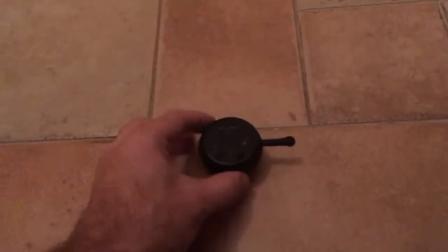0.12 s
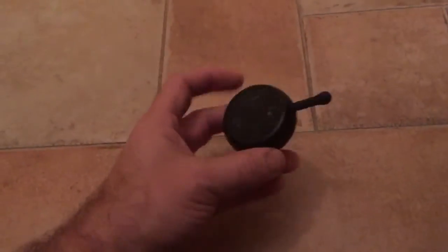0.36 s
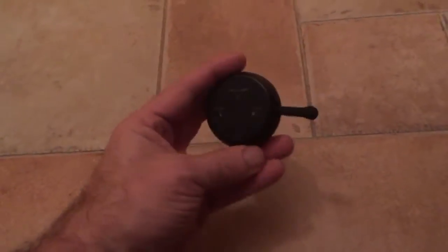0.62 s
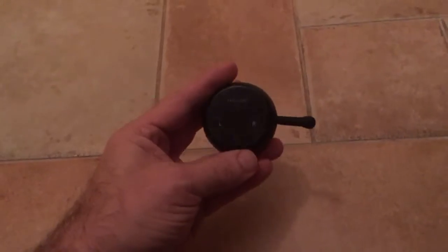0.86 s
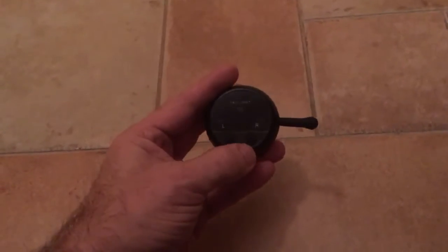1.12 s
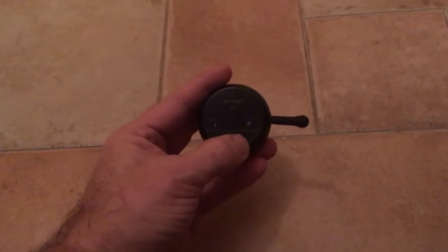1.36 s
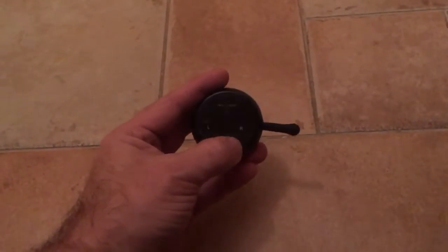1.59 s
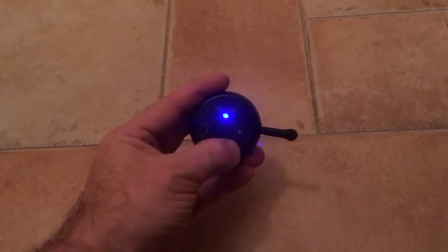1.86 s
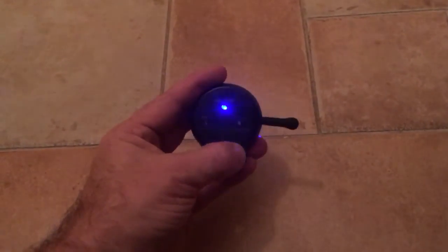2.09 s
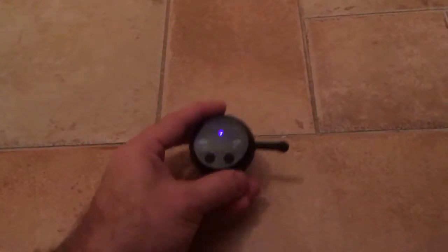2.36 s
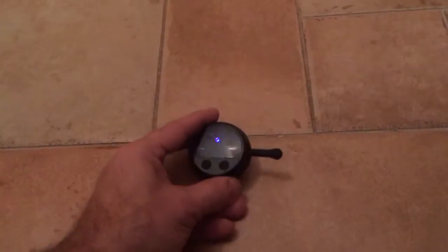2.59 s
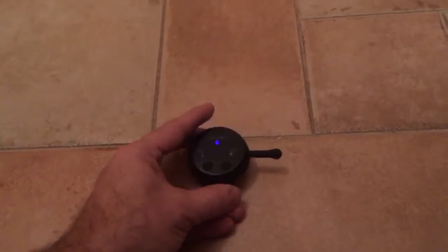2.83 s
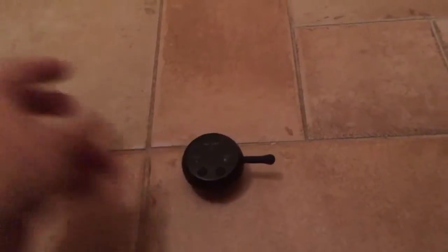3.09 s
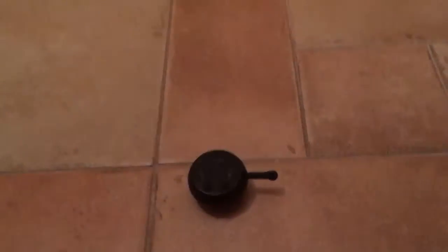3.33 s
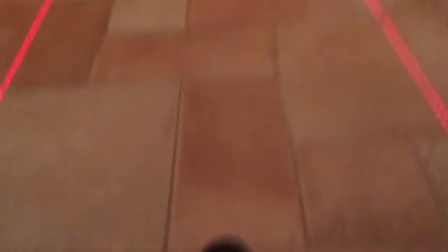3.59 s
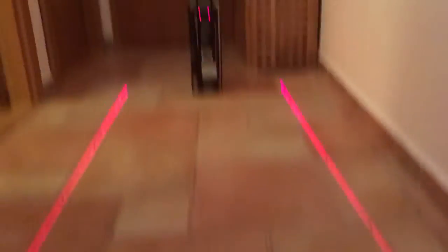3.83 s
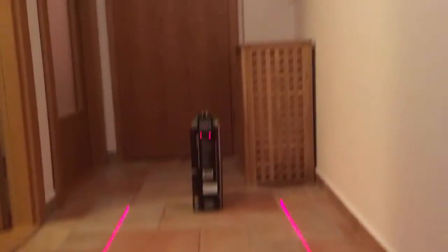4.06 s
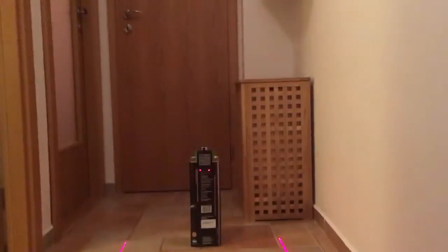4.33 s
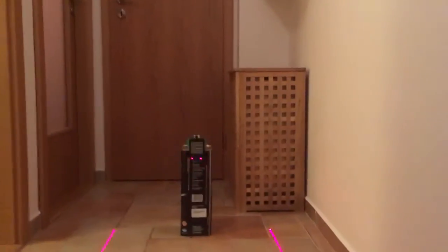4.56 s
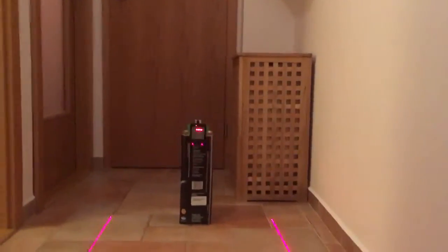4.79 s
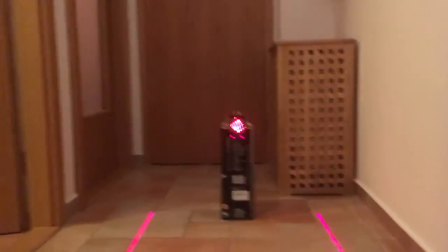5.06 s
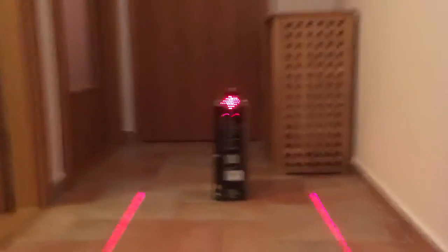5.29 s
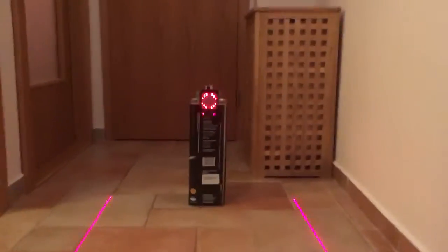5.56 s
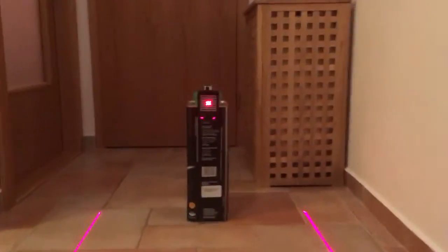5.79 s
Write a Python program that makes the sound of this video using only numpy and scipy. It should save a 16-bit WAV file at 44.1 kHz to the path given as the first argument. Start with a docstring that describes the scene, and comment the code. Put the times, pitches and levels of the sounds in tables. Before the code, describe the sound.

Sharp plastic clicks of a small remote lifted and set down on tile, then loud handling knocks on the phone over faint hum and hiss.

```python
"""Sharp plastic clicks open the scene: a hand lifts a small remote off a tiled floor, presses its button and
sets it down in a bare hallway. Then fingers click, drag and thump on the phone that holds the microphone.
Clicks are struck banks of ringing modes, drags and sleeve rustle are shaped noise, thumps are fading low sines.
Underneath, an appliance hums near 81 Hz over lumpy noise rumble; the microphone circuit adds coloured hiss
and the faint two-humped blips of a radio beacon."""
import sys
import numpy as np
from scipy import signal
from scipy.fft import rfft, irfft, next_fast_len
from scipy.io import wavfile
from scipy.ndimage import map_coordinates

SR = 44100
rng = np.random.default_rng(int(sys.argv[2]) if len(sys.argv) > 2 else 0)


def voltage_ratio(decibels):
    """Convert decibels (scalar or array-like) to amplitude ratios, 20 dB per decade."""
    exponent = np.asarray(decibels, float) / 20
    return 10 ** exponent


def store_pcm(level_fs):
    """Save levels as 16-bit WAV."""
    pcm = np.round(np.clip(level_fs, -1, 1) * 32767).astype(np.int16)
    wavfile.write(sys.argv[1], SR, np.atleast_2d(pcm).T)


N = 261072

# taps on the remote: t/s, level/dB, hardness/(dB per octave), lean/dB from the 3.4 kHz to the 1.8 kHz mode,
# hallway level/dB re the tap
REMOTE_TAPS = [(.0065, -25, -1.5, -1.5, -11), (.034, -46.5, 2.5, 9, 1), (0.0511, -35.5, -4.5, 2, -30),
               (.061, -37, -2, 6, -19), (.371, -64, 10, 9.5, -9), (0.417, -49.5, 0.5, -2.5, -13),
               (0.425, -54.5, 5, 8.5, -18), (.72, -65, 6.5, 1.5, -3.5), (1.7895, -41.5, 9, -1, -14.5),
               (2.0156, -40, 10.5, -3, -12.5), (2.3, -53.5, -5.5, -7, -13), (2.371, -56.5, 6.5, -1.3, -4.5),
               (2.463, -38, 6.5, 0.7, -5.5), (2.7, -54, -2, -3, -6), (2.78, -47.5, -2.5, 4.5, 1),
               (2.8006, -27.5, .9, 6.5, -9.5), (2.803, -25, -3, -9.5, -9), (2.811, -40.5, 4.5, -6, -23),
               (2.819, -38, -1, 1, -13), (2.826, -33.5, 0.2, -6, -22), (2.835, -39.5, -2, -1, -11)]
# ringing modes of the remote's shell: f/Hz, width/Hz, level/dB for a plain tap
SHELL_MODES = [(316, 140, -13), (936, 127, -2.5), (1890, 470, 0.5), (3340, 630, -5.5), (6130, 680, -17),
               (13300, 3100, -36)]
# how the struck spot favours one of the two middle shell modes: one weight per mode, times the lean
MODE_LEAN = np.array([0, 0, 1, -1, 0, 0])
# reverberation of the hallway: f/Hz, t60/s
HALL_DECAY = [(200, 0.18), (1000, 0.38), (3500, 0.31), (7000, 0.41), (12000, 0.07)]
# finger clicks on the phone: t/s, 1.3 kHz level/dB, then 730 Hz, 3.3 kHz and treble level/dB re the first
GRIP_CLICKS = [(3.2938, -58.5, 11, 12.5, -6), (3.5444, -60, 12, -19.5, -13), (3.5856, -59.5, 14, 9, -1),
               (3.6506, -64.5, 4, 18, 0), (3.752, -56, 0, -4, -12), (3.777, -51, -24, 3, -14),
               (3.7955, -29, -12, 9, -6.5), (3.8267, -29.5, -6, -7, -14.5), (3.853, -51, 5, -16, -16),
               (3.872, -40.5, 4, -0.5, -15), (4.02, -39.5, -24, -3.5, -15), (4.024, -45, -29, -4, -15),
               (4.5854, -56, 17, 3, -13), (4.8216, -49, -4, -3, -21), (4.83, -14.5, -43, -4, -14),
               (4.9337, -35.5, -22, .1, -12.5), (5.0224, -52, -27, -6, -9), (5.0527, -30.5, 14, 19, -33),
               (5.0678, -37, 16, 17.5, 2.5), (5.1274, -66.5, -15, 23, -2.1)]
# ringing modes of the phone case: f/Hz, width/Hz, level/dB
CASE_MODES = [(1288, 800, 2), (717, 353, -3.5), (3290, 1900, 1), (7600, 10800, 4.5), (170, 700, 8.5)]
# fingertips dragging on the case: start t/s, rise/s, peak level/dB, fade/(dB per s), bright layer level/dB re dull
FINGER_DRAGS = [(3.57, 0.011, -64, 303, -6), (3.61, 0.05, -69, 608, -7), (3.7, 0.11, -60, 150, -1),
                (3.79, 0.036, -45.5, 1300, -2), (3.81, 0.044, -49, 1500, -8), (3.85, .03, -76, 598, -9),
                (4.012, 0.017, -56.5, 1300, -6), (4.815, 0.014, -39, 1347, -9),
                (5.016, 0.005, -63, 302, 6.5), (5.035, 0.0091, -48, 256, -13),
                (5.055, 0.0091, -45, 1500, 10.5), (5.06, .032, -73, 1500, -28)]
# palm pressing the case, from small presses to slow lurches of the phone: t/s, peak level/dB, f/Hz, t60/s
PALM_THUMPS = [(.755, -45.5, 103, 0.027), (1.432, -44.5, 105, 0.01), (1.677, -54.5, 175, 0.054),
               (3.599, -52, 44.6, 0.2), (3.873, -44, 128, 0.055), (3.874, -39.5, 56, 0.079),
               (4.138, -48.5, 170, .031), (4.226, -49, 156, 0.049), (4.834, -36, 69, 0.056),
               (5.067, -27.5, 80, 0.031), (5.31, -38, 59, .3), (5.312, -49.5, 250, 0.039),
               (5.339, -39.5, 110, 0.0071), (5.386, -44, 102, 0.013), (5.636, -42.5, 150, 0.041),
               (5.74, -47.5, 156, 0.049), (5.811, -40, 144, 0.0077), (5.844, -53, 130.6, 0.082)]
# notches of the microphone port: f/Hz, width/Hz, depth/(0-1)
PORT_NOTCHES = [(2300, 500, .6), (5000, 1000, .85), (10400, 900, .6)]
# sleeve strokes: start t/s, rise/s, peak level/dB, fade/(dB per s), level/dB above 4.5 kHz re the cloth spectrum
SLEEVE_STROKES = [(-.01, 0.014, -54.5, 118, -6), (.1, 0.21, -75.5, 9, -11), (1.25, 0.048, -63, 78, -11),
                  (2.47, 0.075, -72, 6, -4), (3.04, 0.082, -60.5, 75, 3), (3.22, 0.081, -70, 73, -16),
                  (3.55, 0.2, -72, 25, -1.5), (4.0, 0.53, -78, 49, -3), (4.85, 0.079, -70.5, 4.5, -7),
                  (5.124, 0.0051, -65.5, 72, 6), (5.17, 0.073, -60.5, 190, -8), (5.32, 0.21, -72.5, 39, -2),
                  (5.55, 0.074, -72.5, 71, -13), (5.74, 0.2, -82, 16, -3)]
# spectrum shape of rubbing cloth: f/Hz, relative level/(dB per Hz)
CLOTH_SPECTRUM = [(290, -3), (500, -8), (661, -34), (699, -18.5), (990, -0.5), (1080, -4), (1380, -3),
                  (1850, -2.5), (2350, -9.5), (3330, 2.5), (4720, -13), (6150, -8.5), (8710, -22),
                  (14000, -22)]
# course of the appliance hum: t/s, level/dB
HUM_LEVEL = [(0, -61.5), (.4, -55), (.7, -58), (2.2, -58), (2.8, -54.5), (3.5, -61), (4.4, -65.5),
             (4.85, -66), (4.98, -51.5), (5.2, -69), (5.92, -85)]
# course of the room rumble: t/s, level/dB
RUMBLE_LEVEL = [(0, -54.5), (.3, -62), (.65, -60), (2.4, -60), (2.7, -58), (3.2, -60.5), (3.55, -54),
                (3.85, -55.5), (4.4, -59.5), (5.0, -55.5), (5.92, -56.5)]
# spectrum shape of the room rumble: f/Hz, relative level/(dB per Hz)
RUMBLE_SPECTRUM = [(15, -14), (30, -4), (60, 4.5), (100, -9), (160, -10.5), (300, -18.5), (450, -29.5),
                   (700, -28.5), (1000, -120)]
# beacon bursts on the steady beat, a few of them missed: t/s
BEACON_BEAT = np.delete(.0914 + .1024 * np.arange(57), [8, 18, 26, 27, 28, 47])
# beacon bursts off the beat or weakened: t/s, level/dB re a plain burst
BEACON_STRAYS = [(.7475, -6), (.8835, 0), (1.8876, -4), (1.9346, -5), (2.7209, -3), (2.8905, -5),
                 (2.9587, -4), (4.8971, 0), (5.9011, 0)]
# spectrum shape of the circuit hiss: f/Hz, relative level/(dB per Hz)
HISS_SPECTRUM = [(240, -24), (400, -13), (676, -0.5), (839, -2), (1510, -8), (1820, -8), (2430, -10.5),
                 (3470, -3), (4800, -13.5), (5520, -11), (7630, -15), (9470, -12.5), (10400, -15),
                 (14800, -6), (16000, -26)]


def remote():
    """Clicks and taps ring the plastic shell, each with its own hallway answer; harder contacts ring brighter."""
    pivot_hz, top_hz = 960, 6450  # hardness tilts the modes about the first, up to the second
    octaves = np.log2(np.minimum(np.array(SHELL_MODES)[:, 0], top_hz) / pivot_hz)
    sounds = []
    for _, db, hard_db, lean_db, wet_db in REMOTE_TAPS:
        levels_db = db + hard_db * octaves + lean_db * MODE_LEAN
        # the walls average over all directions and hear the plain modes, without scrape
        plain = struck(levels_db, SHELL_MODES, contact_s=1, scrape=0, order=0)
        sound = voltage_ratio(wet_db) * hall(plain)
        tap = struck(levels_db, SHELL_MODES, contact_s=.002, scrape=.13, order=0)
        sound[:len(tap)] += tap
        sounds.append(sound)
    return placed([row[0] for row in REMOTE_TAPS], sounds)


def hall(x):
    """Tiles and bare walls answer after a gap; each frequency dies at its own speed."""
    gap_s, build_s = .004, .007
    hz, t, z = signal.stft(rng.standard_normal(SR // 2), SR, nperseg=256)
    decay = voltage_ratio(-60 * t / along(HALL_DECAY, hz)[:, None])
    tail = signal.istft(z * decay, SR, nperseg=256)[1]
    tail *= 1 - np.exp(-np.arange(len(tail)) / SR / build_s)
    tail /= np.linalg.norm(tail)
    return signal.fftconvolve(x, np.pad(tail, (round(gap_s * SR), 0)))


def phone_case():
    """Structure-borne clicks reach the microphone dry, swelling through case and mount before they die."""
    bass_db, bass_grows = -28, 0.47  # the bass thump rises this many dB per dB of the 730 Hz knock
    sounds = []
    for _, db, *rel_db in GRIP_CLICKS:
        knock_db = db + rel_db[0]
        levels_db = [*(db + np.array([0, *rel_db])), bass_db + bass_grows * knock_db]
        sounds.append(struck(levels_db, CASE_MODES, contact_s=.0006, scrape=.06, order=2))
    return placed([row[0] for row in GRIP_CLICKS], sounds)


def drag():
    """Skin sticks and slips: uneven grit noise through the case's dull and bright modes."""
    unevenness_db = 5.5 * np.array([wobble(400), wobble(400)])
    grit = rng.standard_normal((2, N)) * voltage_ratio(unevenness_db)
    middle, knock, upper, treble = [row[:2] for row in CASE_MODES[:4]]
    dull = unit(filtered(grit[0], lambda f: resonance(f, *middle) ** 2 + 2 * resonance(f, *knock) ** 2))
    bright = unit(filtered(grit[1], lambda f: resonance(f, *upper) ** 3 - .025 * resonance(f, *treble)))
    low, high = strokes(FINGER_DRAGS, power=2.2)
    return low * dull + high * bright


def palm():
    """Soft pushes: low sines with a rounded start, plus small presses at random while the grip shifts."""
    fidgets, start_s, end_s = 14, 3.3, 5.8
    rows = list(PALM_THUMPS)
    for a, b, c in rng.uniform(-1.2, 1, (fidgets, 3)):
        s = np.interp(a, [-1, 1], [start_s, end_s])  # draws below -1 land right at the start
        rows.append((s, -58.5 + 3 * b, 158 * (1 + .2 * c), 0.054))
    t = np.arange(SR // 3) / SR
    sounds = []
    for _, db, hz, t60 in rows:
        onset = 1 - np.exp(-1.5 * hz * t)
        push = np.sin(2 * np.pi * hz * t) * voltage_ratio(-60 * t / t60) * onset
        sounds.append(voltage_ratio(db) * push / np.abs(push).max())
    return placed([row[0] for row in rows], sounds)


def port(x):
    """The microphone port cuts a few notches into sharp sounds."""
    def response(f):
        return np.prod([1 - depth * resonance(f, hz, width) for hz, width, depth in PORT_NOTCHES], axis=0)
    return filtered(x, response)


def sleeve():
    """Cloth friction: noise with a fine flutter, its treble set stroke by stroke."""
    flutter_db = .8 * wobble(40) + 1.2 * wobble(250)
    cloth = unit(noise(CLOTH_SPECTRUM) * voltage_ratio(flutter_db))
    body = filtered(cloth, lambda hz: hz < 4500)
    low, high = strokes(SLEEVE_STROKES, power=1)
    return low * body + high * (cloth - body)


def hum():
    """Appliance hum: a wavering sine and a narrow noise band near 81 Hz, throbbing slowly."""
    throb_hz, swell_s, throb_db = 1.717, 0.39, 2  # rate, time of a swell, depth each way
    band = unit(filtered(rng.standard_normal(N), lambda hz: np.exp(-((hz - 81) / 5) ** 2)))
    pitch_hz = 81 + 2.54 * wobble(6)
    line = np.sqrt(2) * np.sin(2 * np.pi * np.cumsum(pitch_hz) / SR)
    throb = throb_db * np.cos(2 * np.pi * throb_hz * (np.arange(N) / SR - swell_s))
    return voltage_ratio(curve(HUM_LEVEL) + throb) * unit(line + .5 * band)


def rumble():
    """Room rumble: low coloured noise, a little lumpy in level."""
    lumps = voltage_ratio(2.5 * wobble(20))
    return voltage_ratio(curve(RUMBLE_LEVEL)) * unit(noise(RUMBLE_SPECTRUM) * lumps)


def beacon():
    """Each radio burst leaks into the circuit as a brief blip with two spectral humps."""
    burst_db, scatter_db, jitter_s = -53, 0.86, .0001
    times, size_db = np.transpose([*((s, 0) for s in BEACON_BEAT), *BEACON_STRAYS])
    scatter = rng.standard_normal((len(times), 2))
    t = np.arange(-30, 31) / SR
    low = np.exp(-(t / .00017) ** 2) * np.cos(2 * np.pi * 5000 * t + .4)
    high = .45 * np.exp(-(t / .00022) ** 2) * np.cos(2 * np.pi * 9300 * t + 1.2)
    gains = voltage_ratio(burst_db + size_db + scatter_db * scatter[:, 1])
    starts = times + t[0] + jitter_s * scatter[:, 0]
    return placed(starts, -np.outer(gains, low + high))


def hiss():
    """Steady coloured noise of the microphone circuit."""
    return voltage_ratio(-73) * noise(HISS_SPECTRUM)


def struck(levels_db, modes, contact_s, scrape, order):
    """A blow and a short scrape ring every mode at its level; higher orders swell before they die."""
    t = np.arange(SR // 10) / SR
    blow = scrape * rng.standard_normal((len(modes), len(t))) * np.exp(-t / contact_s)
    blow[:, 0] = (-1.) ** np.arange(1, len(modes) + 1)  # neighbouring modes start in opposite directions
    hz, width_hz, mode_db = np.transpose(modes)[..., None]
    ring = t ** order * np.exp(-np.pi * width_hz * t) * np.sin(2 * np.pi * hz * t)
    ring = signal.fftconvolve(ring, blow, axes=1)[:, :len(t)]
    ring /= np.abs(ring).max(axis=1, keepdims=True if ring.ndim else False)
    return voltage_ratio(np.add(levels_db, mode_db[:, 0])) @ ring


def strokes(rows, power):
    """Gains of a dull and a bright layer: each stroke swells as a power of time, then fades at a steady dB rate."""
    t = np.arange(N) / SR
    gains = []
    for s, rise_s, db, fade_db, _ in rows:
        swell = np.clip((t - s) / rise_s, 0, 1) ** power
        gains.append(swell * voltage_ratio(db - fade_db * np.maximum(t - s - rise_s, 0)))
    gains = np.array(gains)
    bright_db = np.array(rows)[:, -1]
    return gains.sum(axis=0), voltage_ratio(bright_db) @ gains


def resonance(f, hz, width_hz):
    """Response of a causal resonance with a peak of height 1."""
    return 1j * f * width_hz / (hz ** 2 - f ** 2 + 1j * f * width_hz)


def noise(spectrum):
    """Coloured noise of rms 1."""
    return unit(filtered(rng.standard_normal(N), lambda hz: voltage_ratio(along(spectrum, hz))))


def filtered(x, response):
    """Shapes x by a complex response of frequency."""
    m = next_fast_len(N + 8192)
    return irfft(rfft(x, m) * response(np.fft.rfftfreq(m, 1 / SR)), m)[:N]


def wobble(rate):
    """A smooth random curve, rate knots a second."""
    knots = rng.standard_normal(int(N * rate / SR) + 4)
    return map_coordinates(knots, [np.arange(N) * rate / SR])


def curve(rows):
    """Level points (t/s, level/dB) drawn as one value per sample."""
    return np.interp(np.arange(N) / SR, *np.transpose(rows))


def along(points, hz):
    """Points (f/Hz, value) read on a log frequency axis."""
    f, v = np.transpose(points)
    return np.interp(np.log(hz + 1), np.log(f + 1), v)


def unit(x):
    """Scales x to rms 1."""
    return x / np.sqrt(np.mean(x ** 2) + 1e-20)


def placed(times, sounds):
    """Short sounds added at their times."""
    out = np.zeros(N + SR)
    for s, sound in zip(times, sounds):
        out[round(s * SR):][:len(sound)] += sound
    return out[:N]


def scene():
    """All sources at the single microphone; clicks and drags pass the notches of its port."""
    clicks = port(remote() + phone_case() + drag())
    return (clicks + palm() + sleeve() + hum() + rumble())[None]


def low_pass(x):
    """Removes everything above the highest recorded frequency."""
    return signal.sosfilt(signal.butter(12, 16640, fs=SR, output="sos"), x)


def record(dry):
    """The microphone drops the deepest bass, below about 30 Hz; its circuit adds hiss and beacon ticks."""
    heard = filtered(dry[0], lambda hz: (1j * hz / (30 + 1j * hz)) ** 2)
    mix = (heard + hiss() + beacon())[None]
    return low_pass(mix)


dry = scene()
out = record(dry)
store_pcm(out)
```